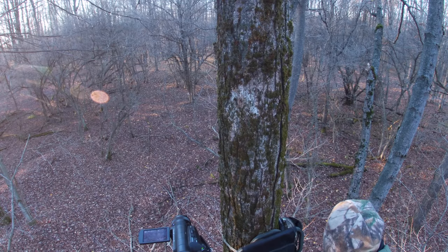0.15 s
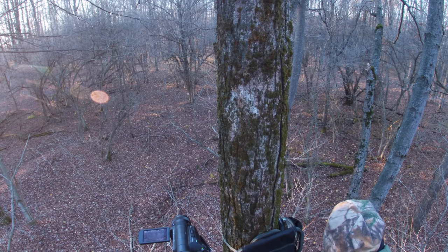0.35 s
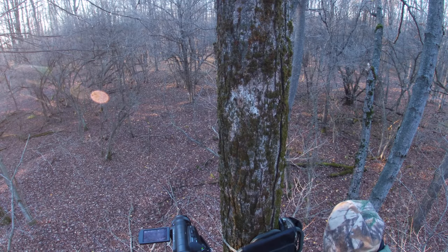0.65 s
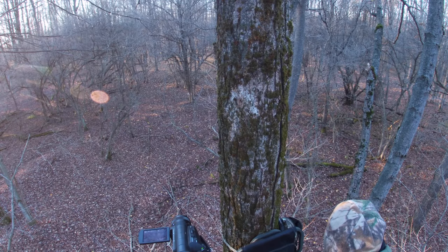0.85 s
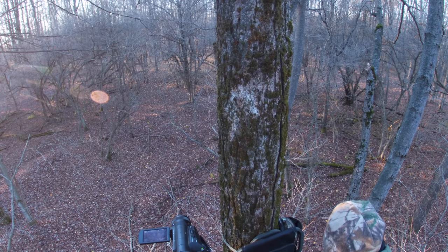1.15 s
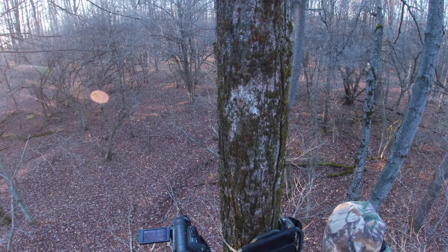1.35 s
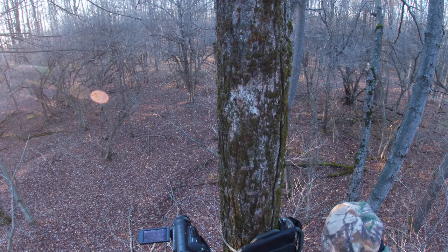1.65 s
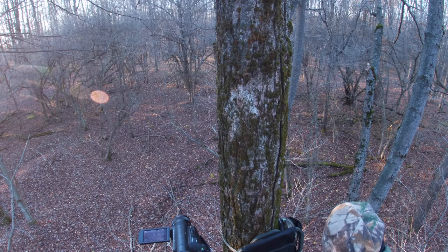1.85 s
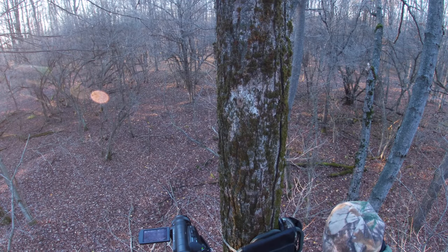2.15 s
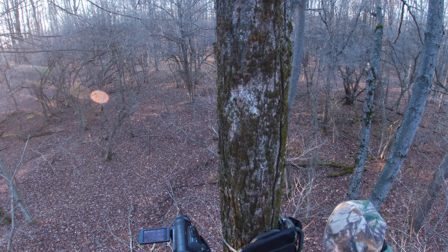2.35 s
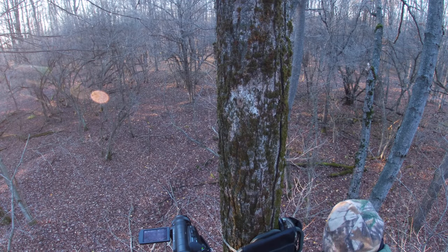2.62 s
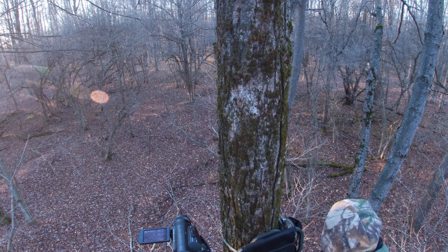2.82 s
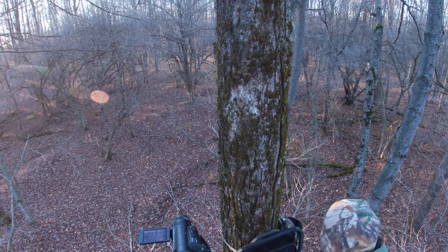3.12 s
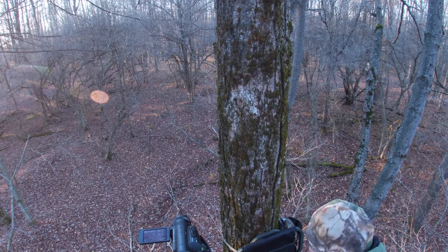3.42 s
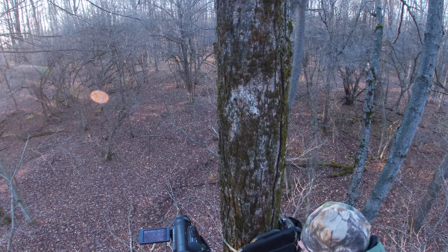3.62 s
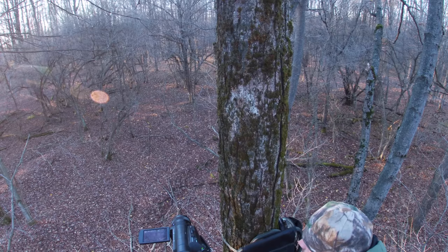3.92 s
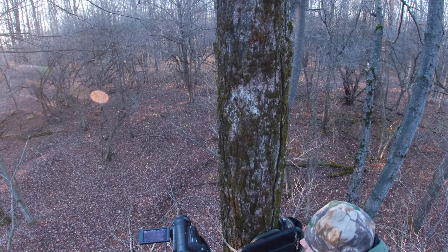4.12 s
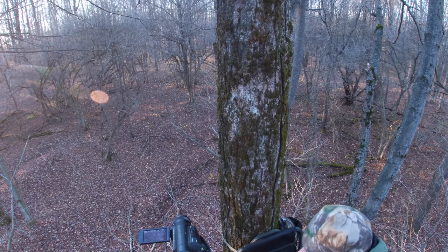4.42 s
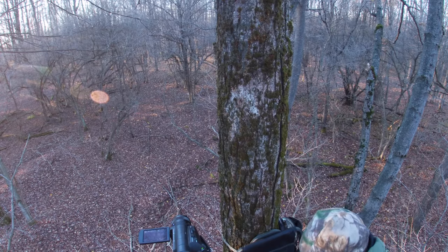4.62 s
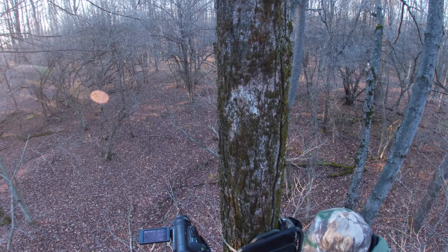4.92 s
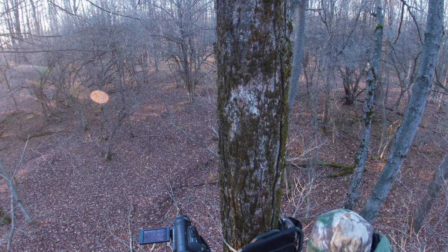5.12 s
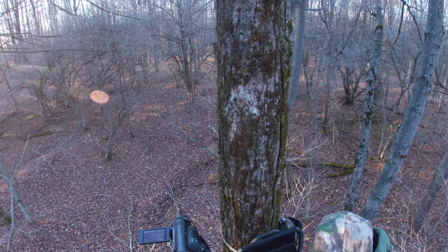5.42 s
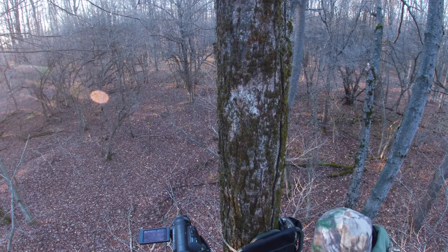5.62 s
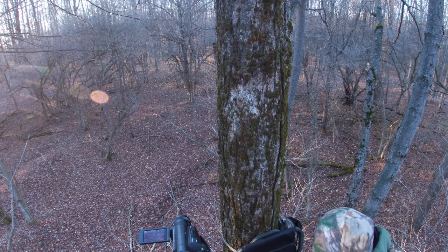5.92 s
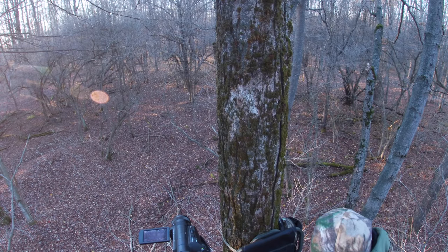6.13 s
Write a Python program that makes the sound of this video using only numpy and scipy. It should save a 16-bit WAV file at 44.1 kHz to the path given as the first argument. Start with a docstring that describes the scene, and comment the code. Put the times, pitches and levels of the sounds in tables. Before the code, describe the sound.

Hard, dry antler clatter starts after half a second, runs dense, then breaks into sparser cracks as wind buffeting swells underneath.

```python
"""Wind rises over faint hiss in bare winter woods: gusts press on the microphone as turbulent noise.
Then, from half a second in, two antlers are knocked and rattled together: each contact is a blow and
a few slips of tine on tine that excite damped modes and a dense crack, amid tiny grains of noise.
The trunks scatter a faint diffuse tail after the contacts, and twice a free tip whistles on briefly."""
import sys
import numpy as np
from scipy import signal
from scipy.fft import rfft, irfft
from scipy.io import wavfile
from scipy.ndimage import uniform_filter1d, minimum_filter1d

SR = 44100
rng = np.random.default_rng(int(sys.argv[2]) if len(sys.argv) > 2 else 0)


def transcribe(u):
    """Save the signal u as a 16-bit wav file named by the first command-line argument.

    u: samples, shape (n,) or (channels, n), limited to [-1, 1]; the rate is SR.
    q: integer samples, one column per channel.
    """
    v = np.clip(np.atleast_2d(u).T, -1, 1)
    q = np.round(v * 32767).astype(np.int16)
    wavfile.write(sys.argv[1], SR, q)


N = 276507
SIZE = 4096  # samples in one contact

# contacts of the antlers: (time [s], level of the middle register over 10 ms [dB],
# pitch of the struck tine [Hz], sliding time [s])
KNOCKS = [(0.557, -30.5, 2360, 0.0027), (0.5718, -24, 3250, 0.00031), (0.5763, -23, 3880, 0.00074),
          (0.5861, -27.5, 2340, 0.0024), (0.6007, -26.5, 2640, 0.0075), (0.6185, -16.5, 3330, 0.0023),
          (0.6638, -27.5, 2250, 0.00034), (0.678, -29.5, 7160, 0.0013), (0.7299, -33.5, 3740, 0.00066),
          (0.775, -29.5, 2270, 0.00052), (0.787, -31.5, 2960, 0.0011), (0.7966, -24.5, 4940, 0.0003),
          (0.924, -45, 3870, 0.0012), (0.9337, -36, 2230, 0.0003), (0.9553, -27, 3770, 0.0016),
          (1.0121, -20.5, 4740, 0.0003), (1.021, -29, 3780, 0.0014), (1.0303, -21, 3770, 0.0044),
          (1.0371, -21, 3670, 0.00027), (1.0484, -29, 2890, 0.0011), (1.0822, -28.5, 3260, 0.0021),
          (1.0922, -27, 5760, 0.0006), (1.1312, -26, 2000, 0.0008), (1.1418, -23.0, 3840, 0.0012),
          (1.1591, -26.5, 2260, 0.00076), (1.1651, -23, 3870, 0.0041), (1.1775, -29, 2090, 0.0008),
          (1.234, -29.5, 4420, 0.0004), (1.3827, -29.5, 3070, 0.0022), (1.404, -18.5, 3360, 0.00064),
          (1.46, -37.5, 3360, 0.0012), (1.519, -20.5, 3710, 0.001), (1.5343, -21, 2300, 0.001),
          (1.5455, -17, 3700, 0.0061), (1.5681, -20, 3850, 0.0022), (1.604, -35.5, 4240, 0.0026),
          (1.6326, -34.5, 3880, 0.011), (1.6728, -18.5, 3410, 0.0025), (1.69, -30.5, 2870, 0.0023),
          (1.7208, -25.5, 3870, 0.002), (1.7413, -34.5, 2620, 0.0046), (1.7809, -44.5, 5940, 0.00069),
          (1.877, -25.5, 4720, 0.0022), (1.89, -27, 2240, 0.0003), (1.9685, -30.5, 3740, 0.0003),
          (1.977, -23, 3940, 0.0023), (1.99, -30.5, 3730, 0.0044), (2.0038, -22.5, 2610, 0.00064),
          (2.011, -17.0, 3670, 0.0063), (2.04, -26, 6050, 0.0016), (2.0486, -24, 3710, 0.0022),
          (2.0891, -32.0, 2560, 0.00083), (2.1092, -36.5, 5520, 0.0006), (2.129, -34.5, 2670, 0.0021),
          (2.1449, -19.5, 3710, 0.0044), (2.1699, -20, 3390, 0.0022), (2.1792, -24.5, 3710, 0.0012),
          (2.1982, -20.5, 2790, 0.0035), (2.235, -39.0, 2550, 0.002), (2.2779, -21.0, 2310, 0.0004),
          (2.365, -26, 7300, 0.00025), (2.4134, -47, 4500, 0.00025), (2.4567, -45.5, 3900, 0.0013),
          (2.6341, -44.5, 4800, 0.0011), (2.673, -20.5, 3780, 0.0008), (2.682, -26, 4970, 0.0003),
          (2.7168, -21, 6200, 0.0013), (2.7346, -29, 3740, 0.002), (2.774, -35, 7060, 0.00074),
          (3.0967, -31, 2690, 0.0003), (3.1006, -21, 3650, 0.00072), (3.1103, -17, 3660, 0.0045),
          (3.121, -24, 3740, 0.0023), (3.129, -22, 3730, 0.0019), (3.1438, -23, 2430, 0.0017),
          (3.1655, -33, 2640, 0.0003), (3.2039, -27, 3780, 0.0023), (3.2342, -25.5, 2230, 0.0007),
          (3.242, -22.5, 3830, 0.0052), (3.2595, -22.5, 2160, 0.00059), (3.2686, -20, 4730, 0.00066),
          (3.2902, -23, 3670, 0.0018), (3.3184, -26.5, 5820, 0.0046), (3.3373, -25.5, 3710, 0.001),
          (3.3456, -17.5, 3210, 0.0069), (3.364, -19.5, 3790, 0.00046), (3.4005, -36.5, 2500, 0.0043),
          (3.4283, -24.5, 3760, 0.0016), (3.451, -21.5, 4930, 0.0034), (3.4647, -20.5, 6920, 0.0042),
          (3.5114, -38.0, 4720, 0.0015), (3.765, -38.5, 6010, 0.0032), (3.7765, -19.0, 2860, 0.00033),
          (3.7885, -24.5, 3170, 0.00027), (3.8001, -20.5, 2940, 0.0052), (3.8088, -20.5, 3240, 0.0017),
          (3.8203, -26, 3340, 0.0024), (3.8801, -27.5, 5460, 0.0027), (3.8916, -22.5, 5040, 0.0003),
          (3.9559, -28.5, 4830, 0.0022), (3.999, -21.5, 3140, 0.0007), (4.027, -22.5, 2210, 0.0021),
          (4.082, -45.5, 4500, 0.00029), (4.2253, -26.0, 6180, 0.003), (4.4658, -39, 2730, 0.0025),
          (4.479, -17.0, 4080, 0.0014), (4.4947, -22.5, 3270, 0.0011), (4.5429, -25.5, 6040, 0.00071),
          (4.5537, -27.5, 3740, 0.0003), (4.5802, -34, 6720, 0.00064), (4.6181, -23.5, 3430, 0.0014),
          (4.625, -26.5, 5610, 0.00085), (4.946, -22.5, 2270, 0.0022), (4.9636, -20.5, 4110, 0.00091),
          (4.9748, -21.5, 3330, 0.0055), (4.996, -31.5, 3430, 0.0008), (5.0052, -27.5, 5600, 0.0003),
          (5.02, -39.0, 5700, 0.0013), (5.2524, -16, 5570, 0.0031), (5.2782, -32.5, 2650, 0.00033),
          (5.3047, -32, 4460, 0.0014), (5.3474, -37, 2850, 0.0039), (5.5938, -27.5, 3540, 0.0033),
          (5.7, -21, 6240, 0.0032), (5.717, -29.0, 6280, 0.0084), (5.7323, -23.5, 4290, 0.003),
          (6.0454, -21.5, 4160, 0.0005), (6.1387, -37.5, 4210, 0.00038), (6.2099, -20.5, 5440, 0.00074),
          (6.228, -29.5, 2900, 0.0023)]
# spectral density of the dense crack of a contact: (frequency [Hz], relative level [dB per Hz])
CRACK = [(100, -32.5), (350, -23.5), (750, -16.5), (1200, 4.5), (1850, -2.5), (2400, 0), (6000, 0),
         (8000, -9), (9500, -17), (11200, -34), (15500, -29.5)]
# small bone radiates bass poorly, and the microphone is dull at the top: (frequency [Hz], gain [dB])
RADIATION = [(100, -9.5), (300, -2.5), (520, -2.5), (800, -3), (1050, 0.5), (9000, -0.5), (10200, -0.5),
             (11500, -5.5), (16000, -13.5)]


def gain_of(db):
    """The decibel is logarithmic: 20 dB is a factor of ten in amplitude."""
    return 10 ** (np.asarray(db) / 20)


def evened(x):
    """Mean power sets the level of a steady signal: scales it to rms 1."""
    return x / np.sqrt(np.mean(x ** 2) + 1e-20)


def unit(x):
    """Total energy sets the level of a transient: scales it to energy 1."""
    return x / (np.linalg.norm(x) + 1e-20)


def read(points, hz):
    """Pitch is logarithmic in frequency: interpolates a table on a log-frequency axis."""
    f, value = np.transpose(points)
    return np.interp(np.log(hz + 1), np.log(f + 1), value)


def add(mix, s, sound):
    """Superposition: pressures add, here from time s [s] on."""
    part = mix[max(round(s * SR), 0):][:len(sound)]
    part += sound[:len(part)]


def noise(spectrum):
    """Filtered white noise: steady, of rms 1, with the given spectral density."""
    white = rfft(rng.standard_normal(N))
    return evened(irfft(white * gain_of(read(spectrum, np.fft.rfftfreq(N, 1 / SR))), N))


def coloured(x, gain_db):
    """Minimum-phase filter: causal, so nothing sounds ahead of the attack."""
    log_gain = np.log(gain_of(np.r_[gain_db, gain_db[-2:0:-1]]))
    # the phase is the Hilbert transform of the log gain
    response = np.exp(np.conj(signal.hilbert(log_gain)))[:len(gain_db)]
    return irfft(rfft(x, SIZE) * response, SIZE)


def dying(x, t60s, size):
    """Frequency-dependent damping: each band of x decays by 60 dB in its own t60."""
    hz, t, z = signal.stft(x, SR, nperseg=size)
    decay = np.exp(-np.log(1000) * t / read(t60s, hz)[:, None])
    return signal.istft(z * decay, SR, nperseg=size)[1][:len(x)]


def ring(hz, t60, t):
    """Damped free vibration: one mode as an exponentially decaying sine."""
    return np.sin(2 * np.pi * hz * t) * np.exp(-np.log(1000) * t / t60)


def airflow(rise_share=0.63, calm_db=-60):
    """Incoherent sources add in power: overlapping gusts swell and die over a calm."""
    # gusts, all of one shape: (time [s], airflow level [dB], dying time to 1/e [s])
    gust_table = [(0.01, -37, 0.066), (0.831, -35, 0.041), (1.01, -38.5, 0.15), (1.46, -43, 0.059),
                  (1.66, -40.5, 0.095), (2.501, -34, 0.22), (2.88, -42.5, 0.07), (3.16, -31.5, 0.27),
                  (3.55, -33, 0.16), (4.16, -25, 0.4), (4.59, -22.5, 0.53), (5.07, -23, 0.3),
                  (5.92, -18.5, 0.4), (6.25, -22, 0.03)]
    t = np.arange(N) / SR
    gusts = []
    for s, level_db, dying_s in gust_table:
        shape = np.exp(-abs(t - s) / (dying_s * np.where(t < s, rise_share, 1)))
        gusts.append(gain_of(level_db) * shape)
    return np.sqrt(gain_of(calm_db) ** 2 + np.square(gusts).sum(0))


def eddies(spectrum, lumpy_db, steady_s=0.11, lump_s=0.033):
    """Intermittency of turbulence: pressure noise comes in short lumps, evened over longer times."""
    lumps_db = lumpy_db * noise([(1, 0), (1 / lump_s, 0), (2 / lump_s, -100)])
    flow = noise(spectrum) * gain_of(lumps_db)
    return flow / np.sqrt(uniform_filter1d(flow ** 2, int(steady_s * SR)) + 1e-6)


def wind(rumble_db=-0.5, buffet_db=-7, flutter_db=-22, strong_db=-25, buffet_growth=1.31, flutter_growth=1.9):
    """Turbulent pressure on the microphone: ever smaller eddies gain strength as the air speeds up."""
    # spectral densities, large eddies to small: (frequency [Hz], relative level [dB per Hz])
    rumble_spectrum = [(8, -11.5), (22, -2), (45, 1.5), (80, -5.5), (110, -16), (150, -31), (260, -67),
                       (600, -130)]
    buffet_spectrum = [(40, -18.5), (100, 4), (150, -5), (220, -18), (300, -37), (420, -45.5), (700, -70),
                       (2500, -130)]
    flutter_spectrum = [(100, -10.5), (210, 2.5), (300, -10.5), (420, -22), (650, -41), (2500, -110)]
    gust = airflow() / gain_of(strong_db)  # 1 in a strong gust
    rumble = gain_of(rumble_db) * gust * eddies(rumble_spectrum, lumpy_db=2)
    buffet = gain_of(buffet_db) * gust ** buffet_growth * eddies(buffet_spectrum, lumpy_db=4.5)
    flutter = gain_of(flutter_db) * gust ** flutter_growth * eddies(flutter_spectrum, lumpy_db=3)
    return gain_of(strong_db) * (rumble + buffet + flutter)


def hiss(level_db=-62.5):
    """Stationary random noise: still air and the hiss of the microphone."""
    # spectral density: (frequency [Hz], relative level [dB per Hz])
    hiss_spectrum = [(30, 14), (200, 16.5), (350, 3), (550, -1.5), (700, 2.5), (1000, -1), (1800, -2.5),
                     (4000, 0), (7000, 0.5), (9000, -18), (11500, -30), (16000, -42)]
    return gain_of(level_db) * noise(hiss_spectrum)


def grain_noise(swell_s=0.014, fade_s=0.027, grain_db=-24, grains_per_s=500, scatter_db=4):
    """Random impulse noise: tiny grains swell just before each contact and fade after it."""
    t, power = np.arange(N) / SR, np.zeros(N)
    for s, level_db, *_ in KNOCKS:
        near = slice(int((s - 0.1) * SR), int((s + 0.1) * SR))
        apart = t[near] - s
        length_s = np.where(apart < 0, swell_s, fade_s)
        power[near] += gain_of(level_db) ** 2 * np.exp(-2 * abs(apart) / length_s)
    sizes = rng.choice([-1., 1.], N) * gain_of(scatter_db * rng.standard_normal(N))
    grains = sizes * (rng.random(N) < grains_per_s / SR)
    hz = np.fft.rfftfreq(SIZE, 1 / SR)
    tick = coloured(np.ones(1), read(CRACK, hz) + read(RADIATION, hz))
    return gain_of(grain_db) * np.sqrt(power) * evened(signal.oaconvolve(grains, tick)[:N])


def contact(t, slide, slips_per_s=1300, slip_size=0.58, stop=1.86):
    """Impact and stick-slip: a blow, then random slips over ridged bone that fade as the slide stops."""
    slips = rng.standard_normal(len(t)) * (rng.random(len(t)) < slips_per_s / SR)
    force = slip_size * slips * np.exp(-(t / (stop * slide)) ** 2)
    force[0] = 1
    return force


def antler(t, hz, tine_hz, spot_db=4, grip=0.022, crack_db=0.9, snap_db=-2, snap_t60=0.0049,
           tine_db=-3, tine_t60=0.016):
    """Modal superposition: modes weighted by the struck spot and detuned by the grip, tine and crack."""
    # modes of the hand-damped bone: (frequency [Hz], level [dB], t60 [s])
    bone = [(1069.4, -4, 0.037), (1172.6, -1, 0.041), (1281, -0.5, 0.048), (1582, -3.5, 0.015),
            (2150, -5.5, 0.03), (2325, 0, 0.019), (2640, -3.5, 0.033), (2910, -7, 0.011), (3297, -4, 0.029),
            (3695, -2, 0.037), (4117, 0, 0.023), (4690, 3, 0.0099), (5527, 3, 0.017), (6200, -2, .016),
            (7140, -2.5, 0.023), (8680, -4.5, 0.009), (9410, -18, 0.011)]
    # decay of the crack: (frequency [Hz], t60 [s])
    crack_t60 = [(400, 0.079), (1300, 0.033), (3500, 0.031), (7000, 0.017), (12000, 0.023)]
    mode_hz, mode_db, mode_t60 = np.transpose(bone)[:, :, None]
    spot, detune, side = rng.standard_normal((3, len(bone), 1))
    weights = np.sign(side) * gain_of(mode_db + spot_db * spot)
    modes = (weights * ring(mode_hz * (1 + grip * detune), mode_t60, t)).sum(0)
    crack = unit(dying(rng.standard_normal(SIZE), crack_t60, size=64))
    snap = unit(rng.standard_normal(SIZE) * np.exp(-np.log(1000) * t / snap_t60))
    dense = unit(coloured(crack + gain_of(snap_db) * snap, read(CRACK, hz)))
    tine = unit(ring(tine_hz, tine_t60, t))
    return unit(modes) + gain_of(crack_db) * dense + gain_of(tine_db) * tine


def knock(level_db, tine_hz, slide, rise_s=0.00033, medium_db=-26, beam_at_medium_db=-4, beam_fall=0.31):
    """Source and resonator: contact force convolved with the bone's response, then balanced by register."""
    # each tine has an edge brightness of its own: (pitch [Hz], edge above 5 kHz re middle register [dB])
    edge = [(2200, -10), (2900, -6.5), (3700, -6), (4700, -7), (5600, 2), (7000, -1)]
    # bounds of the beam, middle and edge registers: (frequency [Hz])
    register_edges = [750, 1700, 5000, 13000]
    t, hz = np.arange(SIZE) / SR, np.fft.rfftfreq(SIZE, 1 / SR)
    # light touches mostly sound the main beam, hard blows the tines
    beam_db = beam_at_medium_db - beam_fall * (level_db - medium_db)
    edge_db = read(edge, tine_hz)
    sound = signal.fftconvolve(contact(t, slide), antler(t, hz, tine_hz))[:SIZE]
    sound = unit(sound * (1 - np.exp(-t / rise_s)))  # bending waves take a moment to spread through the bone
    power = abs(rfft(sound)) ** 2 / (SIZE / 2 * SR / 100)  # mean square over 10 ms
    register_db = [10 * np.log10(power[(hz >= lo) & (hz < hi)].sum())
                   for lo, hi in zip(register_edges, register_edges[1:])]
    lift_db = level_db + np.array([beam_db, 0, edge_db]) - register_db
    # blended across the register bounds
    smooth_db = uniform_filter1d(lift_db[np.digitize(hz, register_edges[1:-1])], size=40)
    return coloured(sound, smooth_db + read(RADIATION, hz))


def antlers():
    """Linear superposition of the contacts: each one rings on beneath the next."""
    out = np.zeros(N)
    for s, *blow in KNOCKS:
        add(out, s, knock(*blow))
    return out


def woods(x, build_s=0.0076, near_db=2, near_s=0.05, trunk_db=3.5):
    """Diffuse scattering: the power of each band returns as countless echoes, near trunks and ground first."""
    # reverberation: (frequency [Hz], t60 [s]); below about 600 Hz it is negative: the echo grows
    # towards the end of the scene, so hardly any of it is heard
    woods_t60 = [(400, -0.6), (1300, 1.17), (3500, 0.84), (7000, 0.5), (11000, 1)]
    # colour of the tail: (frequency [Hz], relative gain [dB])
    woods_colour = [(300, 8), (1200, 0.5), (3500, 2), (7000, -1.5), (9000, -3), (12000, -25.5)]
    hz, t, z = signal.stft(x, SR, nperseg=256)
    build = 1 - np.exp(-(t / build_s) ** 2)
    near = 1 + gain_of(near_db) * np.exp(-t / near_s)
    echo = build * near * gain_of(trunk_db * rng.standard_normal(len(t)))
    echo = (echo * np.exp(-np.log(1000) * t / read(woods_t60, hz)[:, None])) ** 2
    echo = echo / echo.sum(1, keepdims=True)
    power = abs(signal.fftconvolve(abs(z) ** 2, echo, axes=1)[:, :len(t)])
    scatter = signal.stft(rng.standard_normal(N), SR, nperseg=256)[2]
    tail = scatter / np.std(scatter) * np.sqrt(power) * gain_of(read(woods_colour, hz))[:, None]
    return signal.istft(tail, SR, nperseg=256)[1][:N]


def tips(tip_hz=7050, tip_t60=0.38, width_hz=450):
    """Light damping: the shortest tine, flicked free of the hand, rings on as a fuzzy whistle."""
    # flicks of the tip: (time [s], starting level [dB])
    flicks = [(2.365, -47), (4.228, -55)]
    out, t = np.zeros(N), np.arange(SR // 2) / SR
    whistle = noise([(tip_hz - 3 * width_hz, -60), (tip_hz, 0), (tip_hz + width_hz, -5),
                     (tip_hz + 3 * width_hz, -60)])
    for s, level_db in flicks:
        add(out, s, gain_of(level_db - 60 * t / tip_t60))
    return out * whistle


def scene(woods_db=-23, width_db=-8):
    """Mid and side stereo: nearly mono, with a faint side part that grows towards the treble."""
    # side level re the dry mid, ahead of width_db: (frequency [Hz], level [dB])
    side_spectrum = [(60, -83), (180, -69), (550, -52.5), (1650, -40.5), (4970, -24.5), (15000, -18)]
    dry = antlers() + tips() + grain_noise()
    mid = dry + gain_of(woods_db) * woods(dry) + wind() + hiss()
    width = gain_of(width_db + read(side_spectrum, np.fft.rfftfreq(N, 1 / SR)))
    side = irfft(1j * width * rfft(dry), N)  # a quarter cycle ahead
    return np.array([mid + side, mid - side])


def record(dry, ceiling=0.91, edge_hz=16200):
    """Peak limiting and band limiting: a quick gain holds the highest peaks, then a low-pass filter."""
    allowed = ceiling / np.maximum(abs(dry).max(0), ceiling)
    held = dry * uniform_filter1d(minimum_filter1d(allowed, size=45), size=45)  # about 1 ms
    low_pass = signal.firwin(511, edge_hz, window=("kaiser", 9), fs=SR)
    return signal.oaconvolve(held, low_pass[None], "same")


dry = scene()
out = record(dry)
transcribe(out)
```